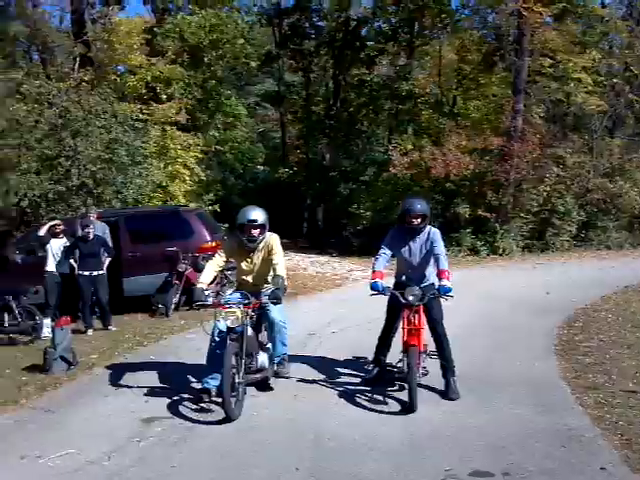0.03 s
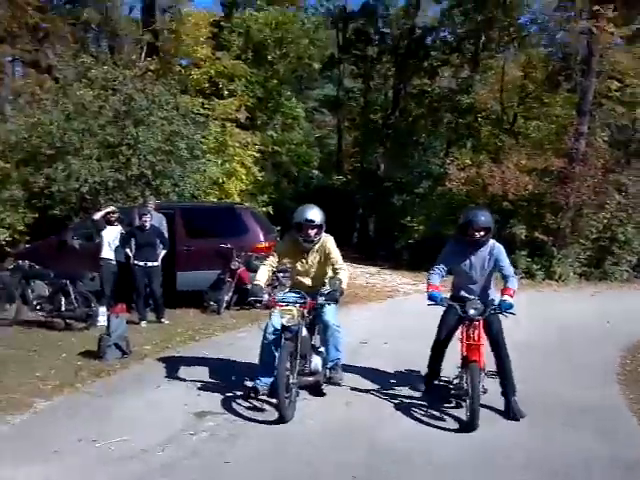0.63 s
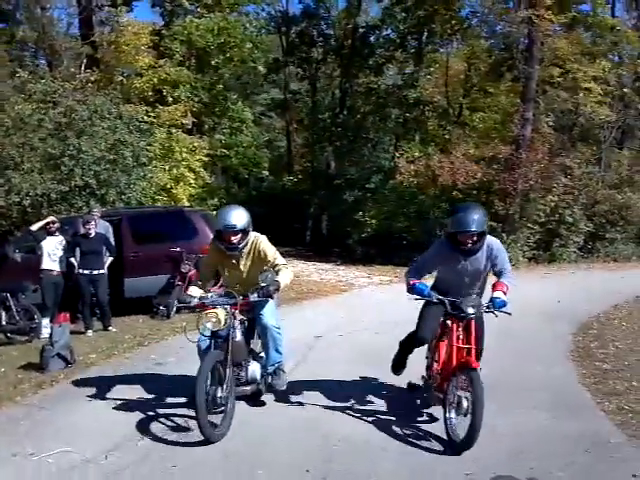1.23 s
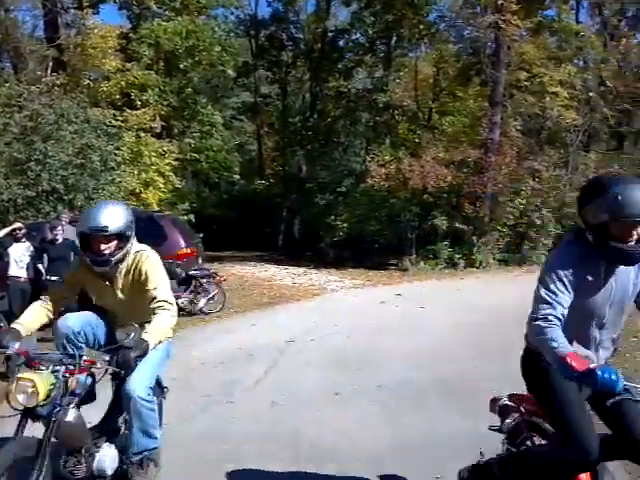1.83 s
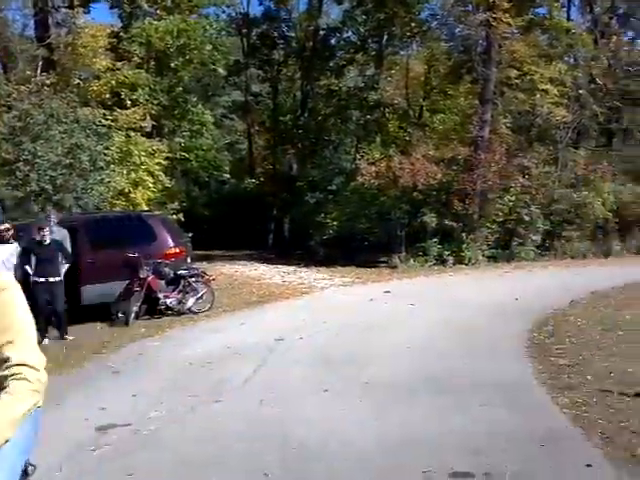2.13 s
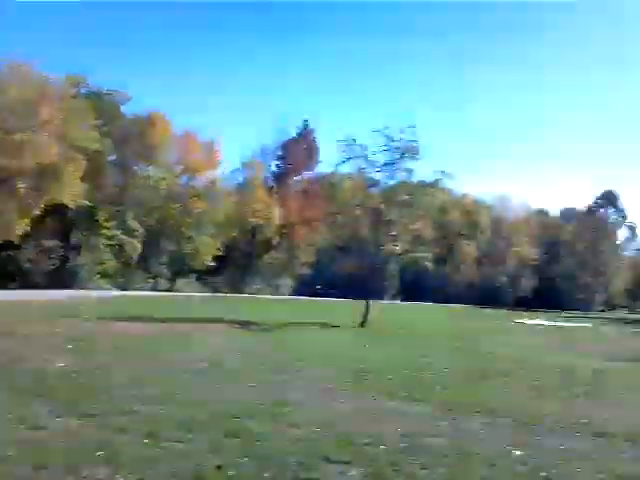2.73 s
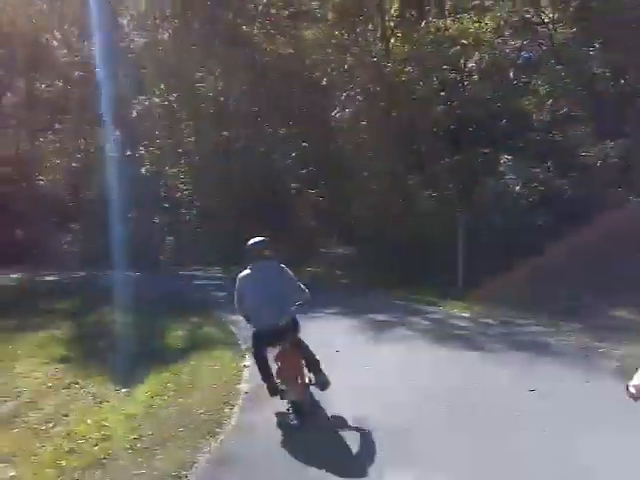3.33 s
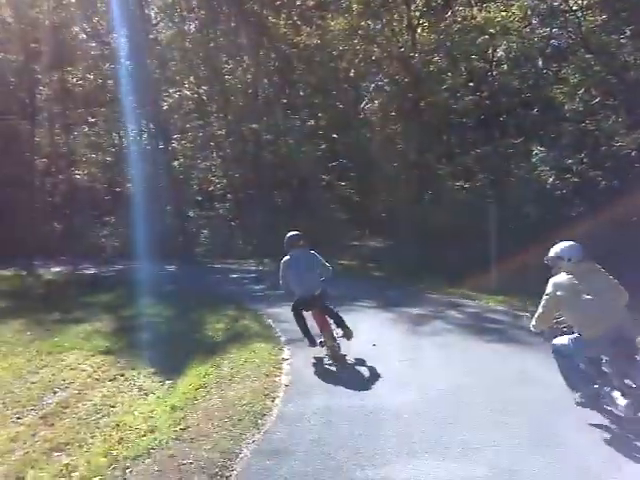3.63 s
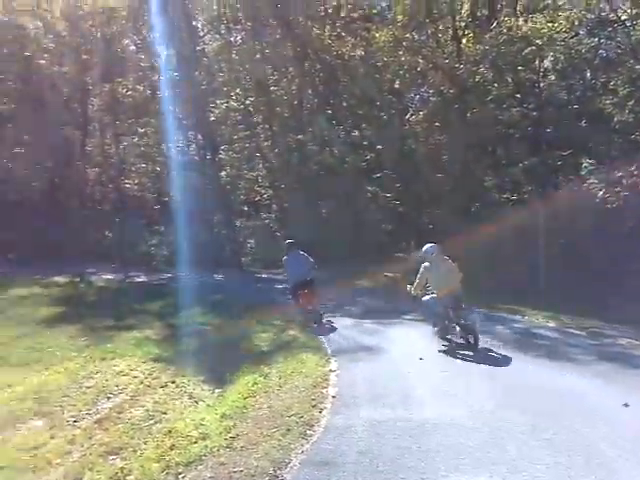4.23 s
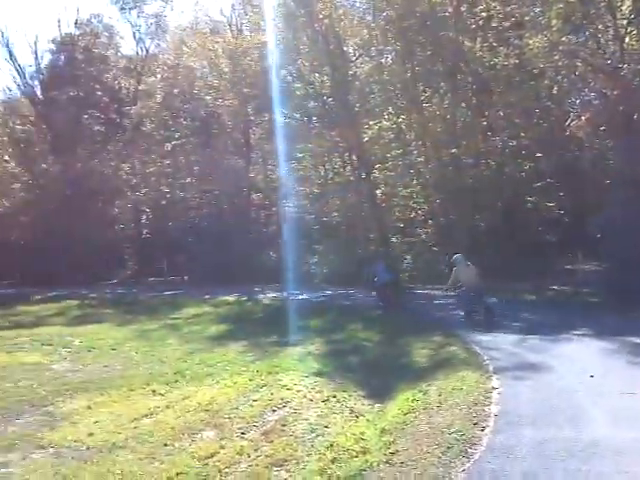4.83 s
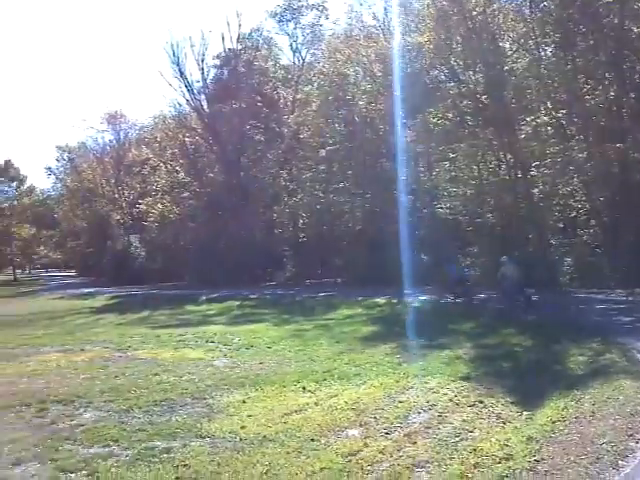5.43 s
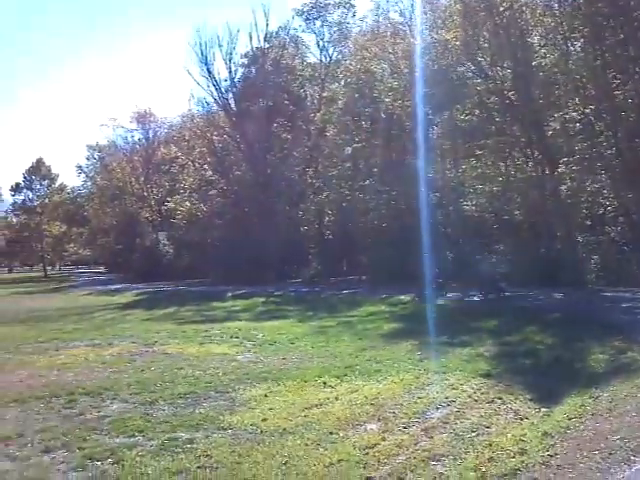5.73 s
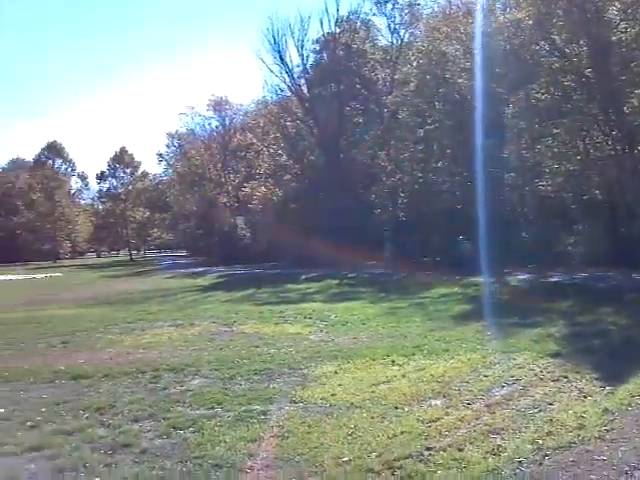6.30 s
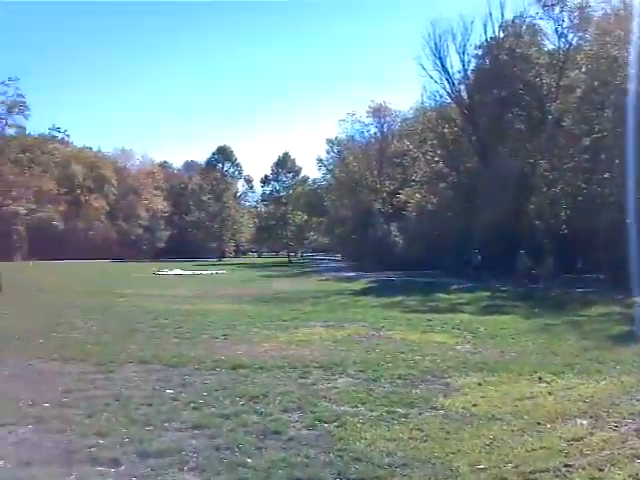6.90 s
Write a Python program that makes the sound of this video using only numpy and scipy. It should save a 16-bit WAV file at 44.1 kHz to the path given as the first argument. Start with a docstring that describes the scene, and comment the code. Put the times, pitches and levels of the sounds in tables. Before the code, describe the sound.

Outdoors on a wooded road, two mopeds open their throttles and approach with a rough, hissing buzz. A soft knock touches the stereo microphone as they ride close past. One holds a fairly even note; the other whines higher, shuts off, sputters and accelerates again farther away. The metallic rattle thins with distance, the trees return a dull echo, and faint gusts rumble near the end.

```python
"""Two tuned two-stroke mopeds pull away, pass close by a stereo microphone and leave down a wooded road.
One winds up, shuts off with a few pops and winds up again; the other labours at a steadier speed.
Each is a train of exhaust blasts, one per crank turn, coloured by its pipe.
The gas jets roar, and piston slap and hiss ring the metal.
Trees echo the exhaust; light wind and a knock touch the microphone."""
import sys
import numpy as np
from scipy import signal
from scipy.fft import rfft, irfft, next_fast_len
from scipy.io import wavfile
from scipy.ndimage import map_coordinates

SR = 44100
rng = np.random.default_rng(int(sys.argv[2]) if len(sys.argv) > 2 else 0)


def dump_mix(stems):
    """Bounce the given channels to the path in sys.argv[1] as a 16-bit WAV at rate SR."""
    frames = np.atleast_2d(stems).T  # one column per channel
    limited = np.clip(frames, -1, 1)  # hard clip at full scale
    pcm = np.round(limited * 32767).astype(np.int16)
    wavfile.write(sys.argv[1], SR, pcm)


N = 311337
T = np.arange(N) / SR
FFT_SIZE = next_fast_len(N + SR // 2, real=True) // 2 * 2
HZ = np.fft.rfftfreq(FFT_SIZE, 1 / SR)
FADE_IN_S, LAUNCH_S = .59, .98  # the sound opens; both mopeds set off

# The revving moped's pipe heard from behind: (frequency [Hz], level [dB])
REVVER_BEHIND = [(115, -19), (225, -17.5), (260, -19.5), (345, -8), (450, -6.5), (570, -12.5), (635, -19.5),
                 (675, -13), (795, -5), (870, -9), (970, -16), (1100, -11), (1260, -14), (1490, -22),
                 (1610, -10), (1730, -17), (1870, -10.5), (2250, -13)]


def amp(db):
    """Decibels to gain."""
    return 10 ** (np.asarray(db) / 20)


def unit(x):
    """Scale to rms 1."""
    return x / np.sqrt(np.mean(x ** 2) + 1e-20)


def along(points, hz=HZ):
    """Join (frequency, value) points on a log axis."""
    knots_hz, values = np.transpose(points)
    return np.interp(np.log(hz + 1), np.log(knots_hz + 1), values)


def curves(rows):
    """One value per sample for each column after the time."""
    times, *columns = np.transpose(rows)
    return [np.interp(T, times, column) for column in columns]


def wobble(rate):
    """A smooth random curve, rate knots a second."""
    return map_coordinates(rng.standard_normal(int(N * rate / SR) + 4), [T * rate], order=2)


def filtered(x, response):
    """Pass x through a frequency response."""
    return irfft(rfft(x, FFT_SIZE) * response, FFT_SIZE)[..., :N]


def causal(gain):
    """The minimum-phase response with this gain."""
    cepstrum = irfft(np.log(np.maximum(gain, 1e-6)))
    cepstrum[1:FFT_SIZE // 2] *= 2
    cepstrum[FFT_SIZE // 2 + 1:] = 0
    return np.exp(rfft(cepstrum))


def below(edge_hz, order=6):
    """A low-pass gain."""
    return 1 / (1 + (HZ / edge_hz) ** order)


def clicks(times, sizes):
    """Impulses placed between samples."""
    at = np.asarray(times)[:, None] * SR
    taps = np.floor(at).astype(int) + np.arange(-7, 9)
    shape = np.sinc(taps - at) * np.cos(np.pi * (taps - at) / 16) ** 2
    return np.bincount(np.clip(taps, 0, N - 1).ravel(), (shape * np.asarray(sizes)[:, None]).ravel(), N)


def spread(mid, side, width):
    """A stereo pair from mid and side; width lists (frequency [Hz], side gain)."""
    side = filtered(side, along(width))
    return np.array([mid + side, mid - side])


def revving_moped():
    """The eager moped: it winds up as it passes, shuts off and winds up again."""
    # Engine speed: (time [s], firing rate [Hz])
    speed = [(0.65, 54.9), (0.85, 70.6), (0.97, 76.6), (1.08, 80.6), (1.3, 82.8), (1.6, 79.9), (1.95, 76.2),
             (2.22, 72.4), (2.42, 76.8), (2.7, 74.5), (2.85, 82.1), (3.15, 90.2), (3.35, 97.4),
             (3.55, 105.5), (3.8, 111.4), (4.1, 116.4), (4.4, 122.7), (4.65, 124.1), (4.92, 125.4),
             (5.15, 110.7), (5.78, 89.6), (6.05, 113.1), (6.27, 122.0), (6.55, 127.4), (6.8, 127.5),
             (7.06, 127.8)]
    # Throttle twists: (opens [s], rise [s], shuts [s], first level [dB], last level [dB])
    throttle = [(.61, 0.17, 2.52, 5, -7), (2.68, 0.22, 4.93, 2.1, 5), (5.68, 0.15, 7.06, 1, 5)]
    # Uneven combustion: (time [s], scatter of blast strength [dB])
    roughness = [(.65, 1.2), (.85, 2), (1.1, 1.3), (2.3, 1.3), (2.7, 4), (2.88, .6), (3.6, .6), (3.72, 1.8),
                 (4.1, 1.2), (4.2, .4), (4.9, .6), (5, 4), (5.7, 3), (5.85, .7)]
    # Exhaust colours along the ride: (frequency [Hz], level [dB])
    launch = [(90, -26.5), (125, -14.5), (165, -14.0), (250, -18.5), (380, -6.0), (500, -5.5), (580, 0.0),
              (750, -9.5), (1030, -10.0), (1130, -17.5), (1280, -8.0), (1450, -13.5), (1650, -12.0),
              (1900, -20.5), (2300, -19.5)]
    ahead = [(90, -28), (125, -13), (165, -7.5), (245, -13), (320, -7), (480, -1.5), (570, -12), (660, -12),
             (780, -6), (940, -14), (1030, -11.5), (1130, -16.5), (1280, -4.5), (1450, -18), (1900, -17.5),
             (2300, -21)]
    beside = [(80, -25.5), (95, -26.0), (160, -12.0), (185, -13.5), (245, -6.5), (275, -7.5), (320, -1.0),
              (555, -12.0), (590, -20.5), (730, -11.5), (775, -15.5), (930, -12.0), (990, -17.0),
              (1300, -16.0), (1515, -27.0), (1875, -22.0), (2250, -28.0)]
    leaving = [(95, -20), (220, -16), (275, -8), (330, -12.5), (370, -2), (465, -6), (535, -.5), (580, -13),
               (720, -9), (765, -4.5), (835, -8), (1130, -13.5), (1255, -5.5), (1370, -21), (1540, -15),
               (1635, -21.5), (2250, -24)]
    far = [(100, -15), (130, -12.5), (195, -18), (250, -14), (340, -3.5), (395, -2.5), (460, -9),
           (515, -16.5), (650, -26), (760, -14.5), (850, -12), (930, -15), (1030, -14), (1165, -16),
           (1290, -24), (1425, -23), (1595, -15.5), (2005, -10), (2250, -11)]
    colours = [launch, ahead, beside, leaving, REVVER_BEHIND, far]
    # The side that faces the listener: (time [s], place in colours [index])
    view = [(.95, 0), (1.25, 1), (2.2, 1), (2.7, 2), (3.1, 2), (3.35, 3), (3.62, 3), (3.95, 4), (5, 4),
            (5.6, 5)]
    level_db = exhaust_level(throttle, distance(ahead_m=5.6, miss_m=5.0), shut_db=-9.5)
    return two_stroke(speed, level_db, view, roughness, colours)


def plodding_moped():
    """The labouring moped: it holds a steadier speed and passes a little closer."""
    # Engine speed: (time [s], firing rate [Hz])
    speed = [(0.65, 57.1), (0.85, 74.1), (1.0, 80.4), (1.2, 83.3), (1.6, 83.1), (2.0, 83.0), (2.22, 88.7),
             (2.47, 94.3), (2.7, 93.1), (3.02, 94.2), (3.17, 86.2), (3.4, 91.5), (3.7, 94.4), (4.04, 96.8),
             (4.2, 91.8), (4.4, 94.7), (4.6, 89.7), (4.9, 93.7), (5.2, 90.1), (5.45, 94.8), (5.85, 98.3),
             (6.4, 99.4), (7.06, 100.3)]
    # Throttle twists: (opens [s], rise [s], shuts [s], first level [dB], last level [dB])
    throttle = [(.62, 0.22, 3.12, 6, -1.5), (3.08, 0.15, 5.1, 0.2, 0), (5.2, 0.95, 7.06, 2, 1)]
    # Uneven combustion: (time [s], scatter of blast strength [dB])
    roughness = [(.8, 3), (1.1, 1.2), (3, 1.2), (5, 1.8), (7, 1.2)]
    # Exhaust colours along the ride: (frequency [Hz], level [dB])
    launch = [(90, -31.5), (125, -23.5), (250, -16.0), (330, -9.0), (380, -12.5), (500, -10.0),
              (830, -20.0), (930, -10.5), (1030, -14.0), (1130, -23.5), (1280, -18.5), (1650, -32.5),
              (2300, -35)]
    ahead = [(90, -35), (165, -14.5), (250, -15), (330, -10.5), (380, -22.5), (430, -24), (500, -7),
             (580, -20), (660, -10.5), (750, -11), (830, -12), (915, -24), (1000, -15), (1150, -11),
             (1320, -10), (1450, -23.5), (1650, -16.5), (2300, -18)]
    closing = [(85, -29.5), (95, -29.0), (165, -12.0), (255, -19.5), (375, -13.0), (550, -9.0),
               (680, -16.5), (745, -9.5), (815, -21.5), (890, -12.5), (1095, -8.0), (1165, -12.5),
               (1235, -7.0), (1435, -22.0), (1880, -20.5), (2120, -33.0), (2250, -29.5)]
    beside = [(95, -23.5), (180, -12.0), (275, -16.5), (465, -11.5), (640, -11.5), (765, -7.5),
              (835, -19.5), (860, -19.0), (935, -7.0), (1020, -7.5), (1115, -21.0), (1220, -11.5),
              (1410, -17.0), (1495, -22.0), (1890, -19.5), (2060, -28.5), (2250, -27.0)]
    behind = [(90, -24.5), (175, -19.5), (295, -24.0), (360, -8.5), (530, -7.5), (670, -7.0), (710, -12.5),
              (800, -16.0), (875, -15.5), (955, -10.5), (1285, -19.0), (1360, -18.0), (1445, -23.5),
              (1625, -16.5), (1725, -22.5), (2000, -17.0), (2250, -24.0)]
    far = [(95, -16.0), (205, -10.0), (275, -14.0), (370, -12.0), (405, -14.0), (465, -6.5), (510, -8.5),
           (555, -17.5), (660, -12.0), (810, -13.5), (860, -18.0), (1055, -12.0), (1150, -14.5),
           (1255, -11.5), (1370, -21.5), (1890, -18.0), (2250, -13.5)]
    colours = [launch, ahead, closing, beside, behind, far]
    # The side that faces the listener: (time [s], place in colours [index])
    view = [(.95, 0), (1.25, 1), (1.9, 1), (2.17, 2), (2.33, 2), (2.55, 3), (3, 3), (3.4, 4), (5.2, 4),
            (5.6, 5)]
    level_db = exhaust_level(throttle, distance(ahead_m=7.3, miss_m=3.9), shut_db=-6.5)
    return two_stroke(speed, level_db, view, roughness, colours)


def two_stroke(speed, level_db, view, roughness, colours, jitter_s_per_db=.00002):
    """One blast per crank turn goes through the pipe, whose colour crossfades as the moped rides by."""
    # The part of a blast that runs back up the pipe, for each colour: (share [0-1])
    pipe_return = [.65, .7, .6, .5, .42, .45]
    firing_hz, = curves(speed)
    facing, = curves(view)
    turns = np.cumsum(firing_hz * (1 + .0006 * wobble(14))) / SR
    times = np.interp(np.arange(1, int(turns[-1])), turns, T)
    # Rough combustion scatters both the strength and the timing of the blasts.
    strength, lateness = rng.standard_normal((len(times), 2)).T
    scatter_db = np.interp(times, *np.transpose(roughness))
    times = times + jitter_s_per_db * scatter_db * lateness
    blasts = clicks(times, amp(scatter_db * np.minimum(strength, 1)))
    tones = np.array([amp(along(colour)) for colour in colours]) * below(2800) * (1 - below(76))
    # The pipe sets the shape of each blast; the view weights its resonances.
    pipe_phase = np.exp(1j * np.angle(causal(tones.mean(axis=0))))
    exhaust = 0
    for index, tone in enumerate(tones):
        fade = np.clip(1 - abs(facing - index), 0, 1)
        exhaust += fade * filtered(blasts, pipe_phase * pipe_smear(pipe_return[index]) * tone)
    gain = amp(level_db)
    return dict(exhaust=gain * exhaust, turns=turns, gain=gain, blasts=blasts)


def pipe_smear(share):
    """Waves run to and fro in the pipe and smear each blast: two all-pass stages."""
    # Round trips in the header and the expansion chamber: (delay [s])
    round_trips = [.0013, .0029]
    delays = np.exp(-2j * np.pi * np.outer(round_trips, HZ))
    passed = np.sqrt(1 - share ** 2)
    return np.prod((passed + delays) / (1 + passed * delays), axis=0)


def exhaust_level(twists, metres, shut_db, idle_db=-11.5, release_s=.054):
    """Level in dB: each throttle twist lifts it from the shut level, and distance takes its share."""
    close_db, close_m, db_per_doubling = 28.5, 1.71, 3
    level_db = shut_db + idle_db * np.clip((LAUNCH_S - T) / (LAUNCH_S - FADE_IN_S), 0, 1)
    for opens, rise, shuts, first_db, last_db in twists:
        held = np.clip((T - opens) / rise, 0, 1) * np.clip(1 - (T - shuts) / release_s, 0, 1)
        level_db += held * (np.interp(T, [opens, shuts], [first_db, last_db]) - shut_db)
    return close_db + level_db - db_per_doubling * np.log2(metres / close_m)


def distance(ahead_m, miss_m, top_m_per_s=17.6, pickup_s=2.44):
    """Metres to a moped that starts up the road, gathers speed and passes beside the listener."""
    riding_s = np.maximum(T - LAUNCH_S, 0)
    travelled_m = top_m_per_s * (riding_s - pickup_s * (1 - np.exp(-riding_s / pickup_s)))
    return np.hypot(miss_m, travelled_m - ahead_m)


def silencer(blasts, cool_hz, hot_hz, width_hz):
    """The silencer can rings hollow while little gas flows through it, higher as the gas heats."""
    # Hollow ring at low throttle: (time [s], level [dB])
    hollow = [(.6, -33), (.7, -42), (.85, -43), (1.02, -34), (1.3, -68), (4.9, -54), (5.02, -56),
              (5.3, -41), (5.6, -65)]
    # Warmth of the gas: (time [s], heat [0 cool, 1 hot])
    heat = [(.66, 0), (.8, 1), (1.1, 0.67), (4.9, 0)]
    level_db, = curves(hollow)
    hot, = curves(heat)

    def ring(hz):
        resonance = 1j * HZ * width_hz / (hz ** 2 - HZ ** 2 + 1j * HZ * width_hz)
        return unit(filtered(blasts, resonance ** 2))

    return amp(level_db) * (np.sqrt(1 - hot) * ring(cool_hz) + np.sqrt(hot) * ring(hot_hz))


def pops(t60=.1, attack_s=.0034):
    """Unburnt mixture goes off in the pipe: a soft blast and a short puff."""
    # After-firing as the revving moped runs down: (time [s], relative level [dB])
    afterfires = [(5.016, -12.5), (5.149, -22), (5.204, -21), (5.258, -18.5), (5.315, -15), (5.733, -17)]
    times, db = np.transpose(afterfires)
    t = np.arange(SR // 10) / SR
    puff = rng.standard_normal(len(t)) * amp(-60 * t / t60) * (1 - np.exp(-t / attack_s))
    bangs = clicks(times, amp(db))
    bangs += .18 * signal.fftconvolve(bangs, puff)[:N]
    pipe = causal(amp(along(REVVER_BEHIND)) * below(1500, order=2) * (1 - below(260)))
    return amp(26.5) * filtered(bangs, pipe)


def jet_roar(engines):
    """Turbulence in the exhaust jets puffs with each firing, in a low band and a high one."""
    # Strength of the jets: (time [s], low band [dB], high band [dB])
    jet_levels = [(.6, -62, -49), (.82, -26.5, -30), (.97, -26, -30), (1.15, -54, -25.5), (2, -52, -32.5),
                  (2.3, -38, -41), (2.55, -36, -40), (2.77, -31.5, -28.5), (2.95, -50, -37),
                  (3.55, -55, -30), (3.75, -29.5, -34), (4.05, -35, -32), (4.25, -50, -33.5),
                  (4.85, -43, -31.5), (5, -38, -32), (5.3, -41.5, -41.5), (5.9, -43.5, -32),
                  (7.06, -44, -29.5)]
    # Colour of the jet noise: (frequency [Hz], level [dB])
    jet_colour = [(30, -27), (100, -26), (200, -20.5), (320, -6), (500, -4.5), (900, -5.5), (1250, -4),
                  (1500, -11), (2000, -1), (2500, -3.5), (3300, -10), (4500, -27)]
    low_db, high_db = curves(jet_levels)
    turbulence = rng.standard_normal((2, N)) * puffing(engines, decay_turns=.4, depth=.5)
    gas = spread(*turbulence, width=[(200, .15), (1000, .4), (2200, 1)])
    colour, low = amp(along(jet_colour)), below(1170, order=4)
    growl = amp(low_db) * unit(filtered(gas, colour * low))
    rush = amp(high_db) * unit(filtered(gas, colour * (1 - low)))
    return growl + rush


def puffing(engines, decay_turns, depth):
    """Gas flow surges as each exhaust port opens; the louder engine dominates."""
    power = sum(engine["gain"] * np.exp(-(engine["turns"] % 1) / decay_turns) for engine in engines)
    power /= sum(engine["gain"] for engine in engines) * decay_turns
    return np.sqrt(1 - depth + depth * power)


def engine_rasp(engines):
    """Piston slap and gas hiss ring the cylinder, fins and pipe; other fins show once the mopeds pass."""
    # Engine clatter: (time [s], relative rasp level [dB], relative sizzle level [dB])
    clatter_levels = [(0.6, -33, -48), (0.63, -49, -59), (0.78, -28, -33.5), (0.89, -25, -29),
                      (1.93, -20, -25), (2.02, -22.5, -25), (2.42, -24, -22.5), (2.69, -30, -30),
                      (2.88, -30, -29), (2.99, -28, -28), (3.12, -32.5, -37.5), (3.32, -30.5, -29),
                      (3.46, -29.5, -31.5), (4.68, -37, -40.5), (4.86, -34, -37.5), (5.08, -38.5, -47),
                      (6.02, -34.5, -41), (7.06, -32.5, -40.5)]
    # Broad colour of the clatter: (frequency [Hz], level [dB])
    clatter_colour = [(300, -98), (1500, -4), (2600, -11.5), (3400, -3.5), (3850, -1), (4400, -0.5),
                      (5100, 3.5), (6000, 0), (8200, -4.5), (10500, -6), (12500, -8), (14500, -13),
                      (16000, -15.5)]
    # Modes of cylinder and pipe: (frequency [Hz], width [Hz], level [dB])
    modes = [(3524, 19, 8.5), (3897, 13, -9), (4140, 51, 0), (4700, 29, -3.5), (4940, 170, -0.5),
             (6330, 44, 5), (6800, 37, -8), (7400, 110, -3.5), (8830, 60, -1.5), (10060, 54, -12),
             (10770, 37, 2)]
    # The engines turn their backs: (time [s], turn [0 facing, 1 away])
    turn_away = [(2.4, 0), (3.3, 1)]
    rasp_db, sizzle_db = curves(clatter_levels)
    away, = curves(turn_away)
    hiss = rng.standard_normal((2, N)) * puffing(engines, decay_turns=1, depth=.06)
    hiss *= amp(.59 * wobble(700))
    shaking = unit(hiss) + 1.3 * piston_slap(engines, t60=.08)
    mode_power = sum(amp(db) ** 2 / (1 + (2 * (HZ - hz) / width) ** 2) for hz, width, db in modes)
    low = below(7720, order=12)
    clatter = 0
    for share, ringing in [(1 - away, 2.6), (away, .6)]:
        fins_db = 2.5 * np.interp(HZ, np.linspace(0, SR / 2, 600), rng.standard_normal(600))
        metal = amp(along(clatter_colour) + fins_db) * np.sqrt(1 + ringing * mode_power)
        rasp = amp(rasp_db + 5) * unit(filtered(shaking, metal * low))
        sizzle = amp(sizzle_db + 10) * unit(filtered(shaking, metal * (1 - low)))
        clatter += share * (rasp + sizzle)
    return clatter


def piston_slap(engines, t60):
    """The piston strikes its bore alike on every turn, so each engine repeats its own short rattle."""
    t = np.arange(SR // 20) / SR
    total_gain = sum(engine["gain"] for engine in engines)
    slaps = 0
    for engine in engines:
        rattle = rng.standard_normal((2, len(t))) * amp(-60 * t / t60)
        strikes = signal.fftconvolve(engine["blasts"][None], rattle, axes=1)[:, :N]
        slaps += engine["gain"] / total_gain * strikes
    return unit(slaps)


def woods(direct, exhaust):
    """The tree line scatters a dull, late answer to the exhaust, blended with the direct sound."""
    # Decay among the trees: (frequency [Hz], time to fall 60 dB [s])
    decay_times = [(150, .2), (1000, .6), (4000, .25), (12000, .08)]
    # With distance the echo gains on the direct sound: (time [s], level [dB])
    echo_level = [(3, -28), (4.8, -22), (5.6, -13), (7, -15)]
    hz, t, noise = signal.stft(rng.standard_normal((2, SR // 2)), SR, nperseg=256)
    _, tail = signal.istft(noise * amp(-60 * t / along(decay_times, hz)[:, None]), SR, nperseg=256)
    scattered = signal.fftconvolve(exhaust[None], tail / np.linalg.norm(tail[0]), axes=1)[:, :N]
    echo = spread(*scattered, width=[(200, .29), (1000, .29), (2200, .083)])
    wet = amp(curves(echo_level)[0])
    return (direct + wet * echo) / np.hypot(1, wet)


def knock():
    """The microphone's housing takes one dull tap."""
    # The tap: (time [s], relative level [dB])
    tap = [(2.439, -14.5)]
    times, db = np.transpose(tap)
    housing = causal(below(300, order=2) * (1 - below(44.8, order=2)))
    return amp(37.5) * filtered(clicks(times, amp(db)), housing)


def wind():
    """A faint breeze and a few light gusts buffet the microphone ports."""
    # Gusts: (centre [s], length [s], relative level [dB])
    gusts = [(5.5, 0.34, -63), (5.943, 0.19, -55), (6.195, 0.16, -51), (6.637, 0.1, -54),
             (6.976, 0.38, -57)]
    # Rumble of air on the ports: (frequency [Hz], level [dB])
    wind_colour = [(20, -14), (60, -2), (130, 6), (220, -2), (500, -32), (1500, -60)]
    breeze = amp(-72)
    flow = breeze + sum(amp(db) * np.exp(-(2 * (T - at) / length) ** 2) for at, length, db in gusts)
    flutter = amp(7.5 + 1.6 * wobble(8.1))
    rumble = unit(filtered(rng.standard_normal((2, N)), amp(along(wind_colour))))
    return spread(*(flow * flutter * rumble), width=[(60, 1), (300, .49)])


def scene():
    """Both mopeds, their echo, the wind and the knock at the two microphone ports."""
    revver, plodder = revving_moped(), plodding_moped()
    engines = [revver, plodder]
    hollow_ring = silencer(revver["blasts"], cool_hz=572, hot_hz=601, width_hz=32)
    exhaust = revver["exhaust"] + plodder["exhaust"] + hollow_ring + pops()
    direct = spread(exhaust, -exhaust, width=[(100, .24), (600, .18), (1500, .6), (2600, .15)])
    return woods(direct, exhaust) + wind() + jet_roar(engines) + engine_rasp(engines) + knock()


def record(dry):
    """The microphone widens its close ports: each loses a delayed copy of the other; bass is restored."""
    # Lean of the stereo image: (frequency [Hz], left minus right before the treble comb [dB])
    balance = [(100, 1.5), (250, 5.5), (500, 0.5), (1000, -1.5), (2000, -4.5), (5000, -2), (10000, -4),
               (15000, -1.5)]
    cross_delay_s, fade_s, top_hz = 16 / SR, .06, 15750
    angle = np.pi * HZ * cross_delay_s
    bass_lift = 1 / np.hypot(np.sin(np.minimum(angle, np.pi / 2)), .17)
    mid = filtered((dry[0] + dry[1]) / 2, 1j * np.sin(angle) * bass_lift)
    side = filtered((dry[0] - dry[1]) / 2, np.cos(angle) * bass_lift)
    treble_comb = abs(np.sin(np.maximum(angle, np.pi / 2)))
    lean_db = along(balance) * treble_comb / 2
    fade_in = np.clip((T - FADE_IN_S) / fade_s, 0, 1) ** 2
    pair = np.array([mid + side, mid - side]) * fade_in
    return filtered(pair, amp([lean_db, -lean_db]) * below(top_hz, order=400))


dry = scene()
out = record(dry)
dump_mix(out)
```